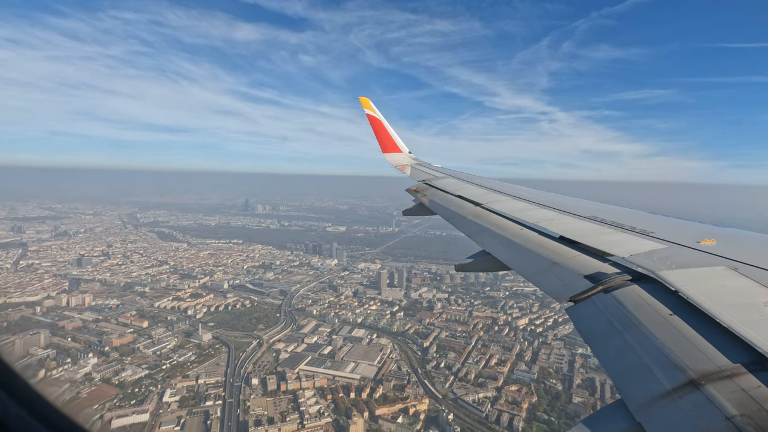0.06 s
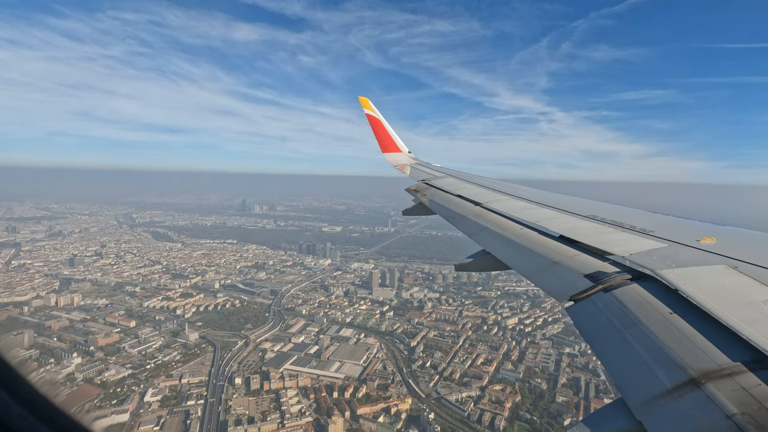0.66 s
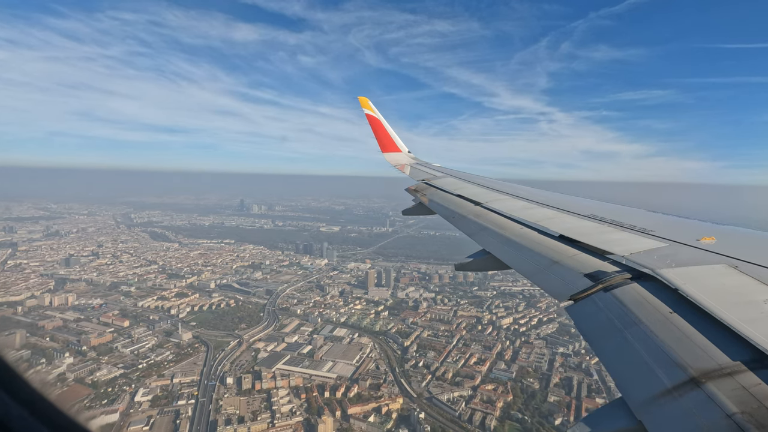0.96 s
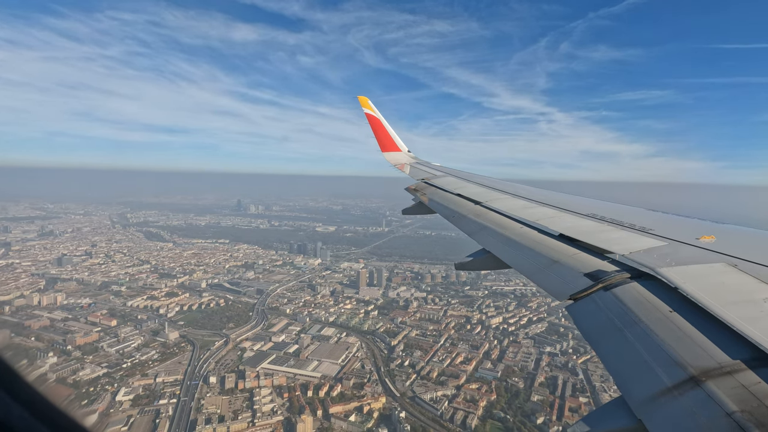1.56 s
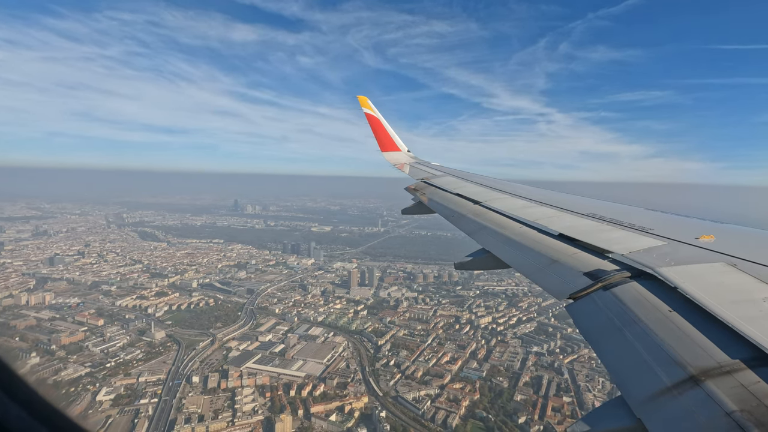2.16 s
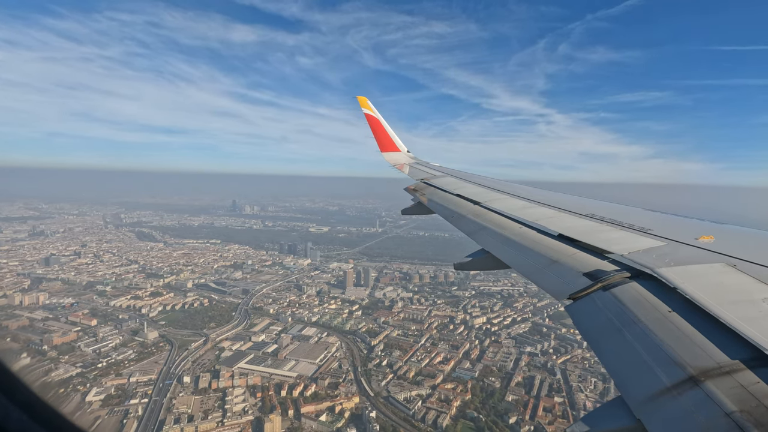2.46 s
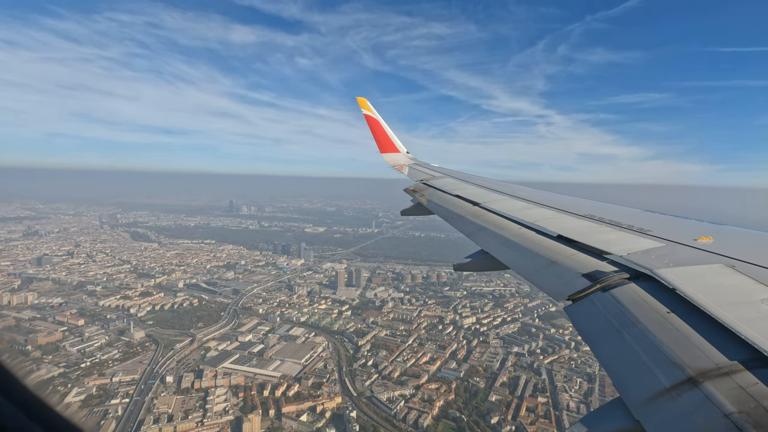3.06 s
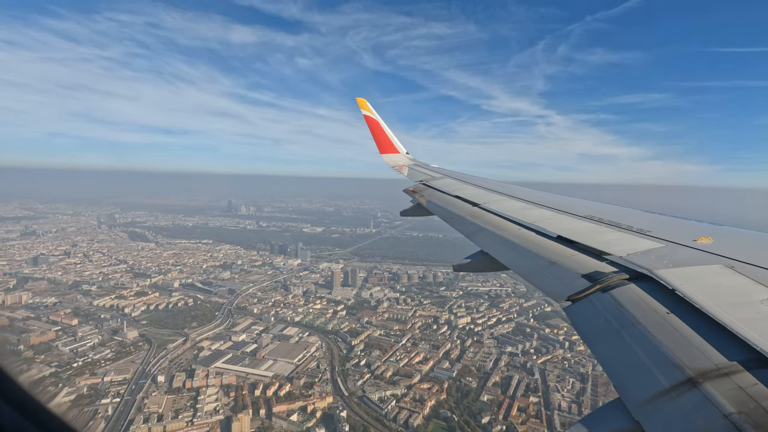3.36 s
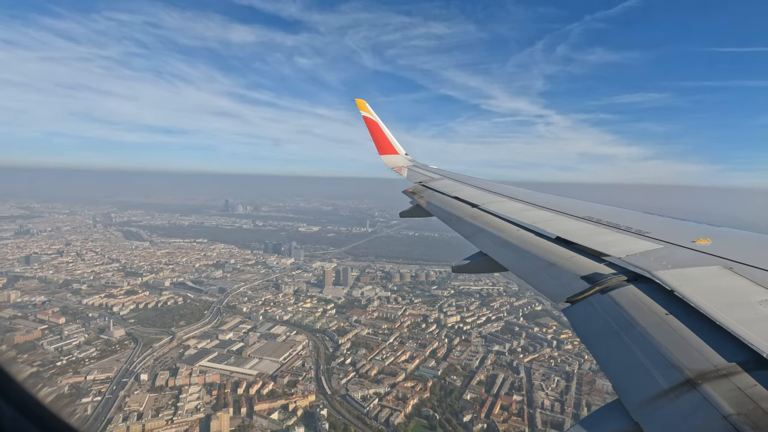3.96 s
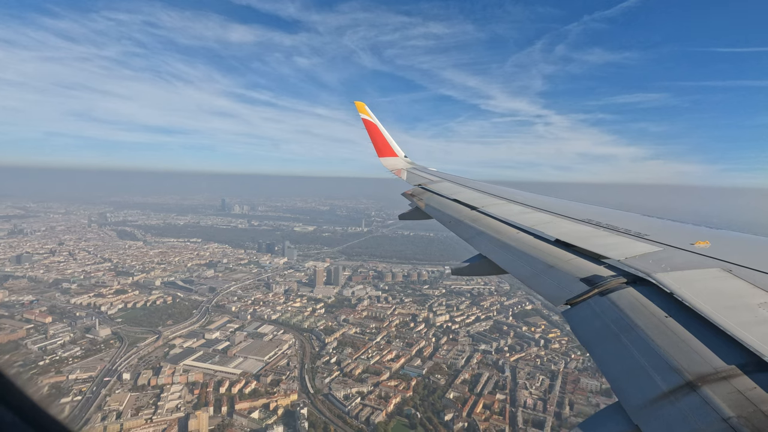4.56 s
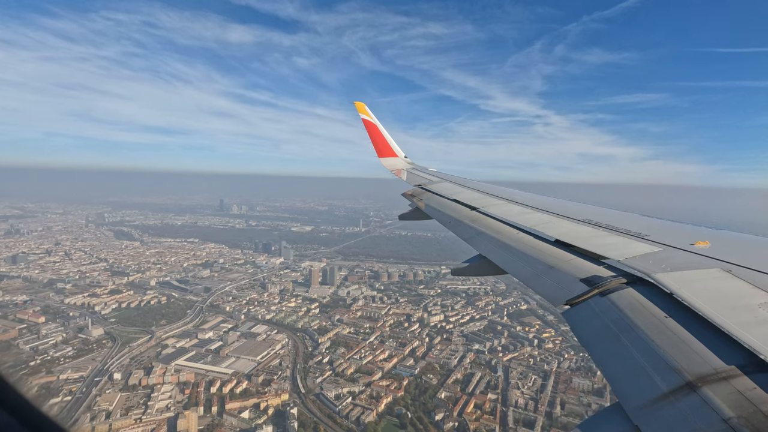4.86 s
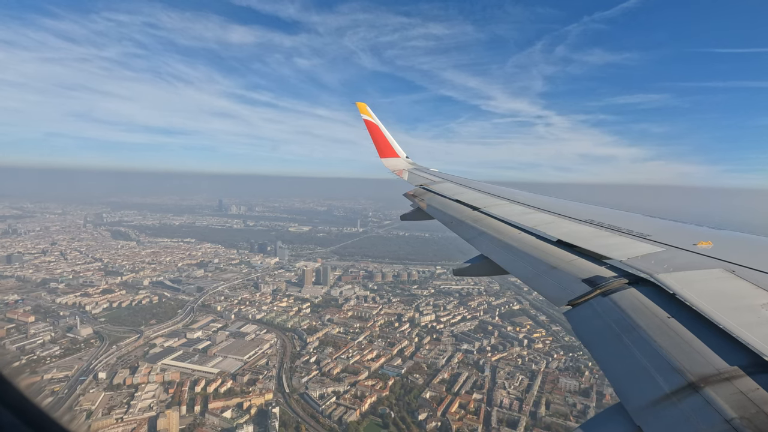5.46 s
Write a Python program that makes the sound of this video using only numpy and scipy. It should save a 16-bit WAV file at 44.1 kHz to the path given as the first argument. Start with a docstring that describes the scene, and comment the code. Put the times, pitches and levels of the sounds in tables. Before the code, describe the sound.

Jet engines rumble and drone evenly through an airliner cabin in flight, while a plastic wrapper faintly rustles and ticks.

```python
"""Airliner engines rumble and drone through the fuselage, heard in flight at a window over the wing.
Air rushes along the skin and a fast rotor holds a thin whine. Close by, a plastic wrapper rustles
and ticks faintly as its creases give way; there are a few soft scuffs, and near the end a bit
of trim clacks. A limiter on the bass holds down the crests of the roar."""
import sys
import numpy as np
from scipy.fft import rfft, irfft, next_fast_len
from scipy.io import wavfile
from scipy.ndimage import uniform_filter1d, minimum_filter1d, map_coordinates

SR = 44100
rng = np.random.default_rng(int(sys.argv[2]) if len(sys.argv) > 2 else 0)


def to_wav(s):
    """Save 16-bit WAV."""
    ch = np.atleast_2d(s).T  # columns
    pcm = np.round(np.clip(ch, -1, 1) * 32767)  # PCM
    wavfile.write(sys.argv[1], SR, pcm.astype(np.int16))


N = 246959
TIME = np.arange(N) / SR
ATTACK_S = 0.000099  # onset of a crinkle or a clack


def amp(db):
    """Decibels to gain."""
    return 10 ** (np.asarray(db) / 20)


def unit(x):
    """Scale to rms 1."""
    return x / np.sqrt(np.mean(x ** 2) + 1e-20)


def along(points, hz):
    """Read a curve of (f/Hz, value) breakpoints on a log frequency axis."""
    f, values = np.transpose(points)
    return np.interp(np.log(hz + 1), np.log(f + 1), values)


def wobble(rate):
    """Smooth random modulation, rate knots a second."""
    knots = rng.standard_normal(int(N * rate / SR) + 4)
    return map_coordinates(knots, [np.arange(N) * rate / SR])


def swell(centre_s, half_s):
    """A bell-shaped fade in and out."""
    return np.exp(-.5 * ((TIME - centre_s) / half_s) ** 2)


def filtered(x, response):
    """Zero-phase EQ; response gives the gain at each frequency."""
    size = next_fast_len(N + SR // 2)
    return irfft(rfft(x, size) * response(np.fft.rfftfreq(size, 1 / SR)), size)[..., :N]


def steady(x, span_s):
    """Ride a noise to rms 1, evening out swells slower than span_s."""
    power = uniform_filter1d(np.mean(x ** 2, axis=0), max(int(span_s * SR), 1))
    return x / np.sqrt(np.abs(power) + 1e-6)


def stereo(mid, side, width=1):
    """Mid and side to left and right."""
    return np.array([mid + width * side, mid - width * side])


# Stereo image of the cabin: f/Hz, left-right correlation
CABIN_IMAGE = [(150, .9995), (280, .998), (480, 0.96), (700, .88), (950, 0.85), (1250, .75), (1900, .72),
               (2300, .76), (2950, .33), (3900, 0.54), (5400, .48), (7200, 0.55), (12000, .35)]
def diffuse(response):
    """Coloured noise of rms 1 that fills the cabin: near mono in the bass, wider higher up."""
    def mid_side_eq(hz):
        spread = np.arccos(np.clip(along(CABIN_IMAGE, hz), 0, 1)) / 2
        return response(hz) * [np.cos(spread), np.sin(spread)]
    mid, side = filtered(rng.standard_normal((2, N)), mid_side_eq)
    return unit(stereo(mid, side))


def rush(spectrum):
    """A diffuse noise bed shaped by an EQ curve."""
    return diffuse(lambda hz: amp(along(spectrum, hz)))


def band(centre_hz, width_hz):
    """Diffuse noise in one resonance."""
    return diffuse(lambda hz: 1 / (1 + ((hz - centre_hz) / width_hz) ** 2))


# EQ of the deep rumble in the airframe: f/Hz, level/dB
RUMBLE_EQ = [(8, -20.5), (20, -9), (32, -8.5), (41, -5), (48, 2), (58, .3), (78, -.8), (98, -1.8),
             (108, -2.5), (118, -9), (150, -17), (220, -42), (400, -100)]
# EQ of the cabin drone: f/Hz, level/dB
DRONE_EQ = [(70, -35.5), (110, -5.5), (135, 2.5), (166, -2.5), (195, 0.15), (218, -1.72), (260, -5.5),
            (300, -9.5), (350, -11.5), (400, -17), (475, -22), (620, -34), (1200, -95.5)]
# Narrow hums of engines and fans: f/Hz, half width/Hz, level/dB
HUM_BANDS = [(88.1, 2.5, -29), (425, 11, -45), (447, 1.8, -51), (509.6, 4.8, -51), (1075, 9.8, -70.5),
             (2320, 22, -72.5)]
def engines(rumble_db=-15.5, drone_db=-20.0):
    """At constant thrust, rumble and drone come through the structure; turning parts hum on top."""
    rumble = amp(rumble_db) * steady(rush(RUMBLE_EQ), span_s=0.14)
    drone = amp(drone_db) * steady(rush(DRONE_EQ), span_s=.2)
    hums = sum(amp(db) * steady(band(hz, width), span_s=0.23) for hz, width, db in HUM_BANDS)
    return rumble + drone + hums


def whine(pitch_hz=917, drift_hz=1.2, level_db=-54.0, waver_db=0.9):
    """A fast rotor holds one thin tone, its level wavering separately left and right."""
    phase = 2 * np.pi * np.cumsum(pitch_hz + drift_hz * wobble(5.6)) / SR
    waver = np.array([wobble(11), wobble(5.5)])
    return amp(level_db + waver_db * waver) * unit(np.sin(phase))


# EQ of the air along the skin: f/Hz, level/dB
AIR_EQ = [(300, -46.5), (480, -8.5), (690, 0.14), (810, -5), (930, -1.5), (1040, -5.5), (1200, -12),
          (1450, -12.3), (1750, -17), (2200, -16), (2900, -23), (3450, -28), (3950, -24), (4450, -26.5),
          (5100, -33), (7200, -38.5), (8400, -50), (11500, -52.5), (14000, -65.5)]
def airflow(level_db=-44.5, flutter_db=1.15):
    """The turbulent layer on the skin hisses evenly, with a slight flutter."""
    return amp(level_db + flutter_db * wobble(3.1)) * rush(AIR_EQ)


WRAPPER_WIDTH = .38  # side gain against mid
# Bright colour of thin plastic: f/Hz, level/dB
PLASTIC_EQ = [(900, -18.5), (1500, 1), (2300, -1), (3300, -3), (4500, 1.5), (5800, -1.5), (7000, -1),
              (8200, -7.5), (9400, -15), (11000, -11.5), (12500, -14.5), (14500, -36.5)]
# Bouts of handling the wrapper: start t/s, end t/s, level/dB
HANDLING_CUES = [(0.035, 1.5, -71.5), (1.565, 2.13, -69), (2.222, 3.08, -74.5), (3.752, 5.578, -78.5)]
# The film sliding over itself: t/s, level/dB, half length/s
RUB_CUES = [(0.41, -67, .016), (0.575, -66, .02), (0.745, -65, .016), (0.97, -70, .012), (1.09, -65, .016),
            (1.37, -66, .016), (1.615, -64, .012), (1.915, -64, .016), (1.985, -65, .012),
            (2.035, -62, .012), (2.112, -65, .012), (2.435, -69, .02), (2.605, -69, .024),
            (2.995, -65.5, .015), (3.06, -68, .018), (3.83, -71, .045), (4.43, -72, .025),
            (4.61, -69.5, .02), (5.11, -67.5, .018)]
def wrapper(spiky_db=4.5, clump_db=3.0, fidget_db=1.5, flex_db=-73, grip_s=.04, let_go_s=0.043):
    """Tiny creases give way in clumps as the film is handled, more in each rub and around each crinkle."""
    handling = np.zeros(N)
    for start, end, db in HANDLING_CUES:
        fade_in = np.clip((TIME - start) / grip_s + 1, 0, 1)
        fade_out = np.exp(-np.maximum(TIME - end, 0) / let_go_s)
        handling += amp(db) * fade_in * fade_out
    handling *= amp(fidget_db * wobble(16))
    flexing = amp(flex_db) * sum(swell(s, half_s=.018) for s, *_ in CRINKLE_CUES)
    rubbing = sum(amp(db) * swell(s, half_s) for s, db, half_s in RUB_CUES)
    envelope = np.sqrt(handling ** 2 + flexing ** 2 + rubbing ** 2) * amp(clump_db * wobble(90))
    creases = unit(amp(spiky_db * wobble(1200))) * rng.standard_normal((2, N))
    mid, side = unit(filtered(creases, lambda hz: amp(along(PLASTIC_EQ, hz))))
    return envelope * stereo(mid, side, WRAPPER_WIDTH)


# Larger creases snapping: t/s, level/dB, ring f/Hz, t60/s
CRINKLE_CUES = [(0.028, -49, 7000, .05), (0.0715, -52, 7000, 0.04), (0.158, -57, 6460, .06),
                (0.225, -49.5, 4000, .07), (0.289, -53, 11800, .05), (0.458, -51, 7200, .06),
                (0.5582, -49, 6600, 0.09), (0.629, -52, 11500, .04), (0.725, -56, 5000, .04),
                (0.8218, -50, 6960, 0.042), (0.8668, -51.5, 11600, .08), (0.9595, -55, 6400, 0.07),
                (1.076, -56.5, 11000, .08), (1.173, -49, 7400, .03), (1.2035, -55, 7400, .03),
                (1.43, -45, 7000, .055), (1.5135, -50.5, 11500, .04), (1.6075, -53, 6000, .06),
                (1.675, -51, 7000, 0.043), (1.6872, -50, 6500, .04), (1.76, -55, 6500, .04),
                (1.792, -55, 7100, .04), (2.039, -40, 7500, 0.036), (2.0415, -44, 10800, .03),
                (2.118, -53, 6000, .04), (2.1245, -48.5, 7600, 0.06), (2.2378, -55, 7000, .05),
                (2.44, -56, 7400, .06), (2.765, -55, 7000, .04), (2.8145, -51, 6500, 0.054),
                (3.0083, -52, 10800, 0.069), (3.05, -51.5, 7040, 0.031), (3.959, -50, 7000, 0.055),
                (4.6404, -54, 7200, .04)]
def crinkles(crest_db=6.0, spiky_db=4.5, ring_db=7.5, ring_octaves=.18, size=8192):
    """A larger crease snaps through: a burst of tiny cracks that rings at its own pitch and dies fast."""
    out = np.zeros((2, N + size))
    age, hz = np.arange(size) / SR, np.fft.rfftfreq(size, 1 / SR)
    for s, db, ring_hz, t60 in CRINKLE_CUES:
        boost_db = ring_db * np.exp(-.5 * (np.log2((hz + 1) / ring_hz) / ring_octaves) ** 2)
        cracks = rng.standard_normal((2, size)) * amp(spiky_db * rng.standard_normal(size))
        mid, side = unit(irfft(rfft(cracks) * amp(along(PLASTIC_EQ, hz) + boost_db)))
        snap = amp(db - crest_db - 60 * age / t60) * (1 - np.exp(-age / ATTACK_S))
        out[:, round(s * SR):][:, :size] += snap * stereo(mid, side, WRAPPER_WIDTH)
    return out[:, :N]


# Swells of midrange noise: t/s, level/dB, f/Hz, half width/Hz, half length/s
SWELL_CUES = [(1.61, -52, 1300, 400, .025), (1.68, -59.5, 1800, 900, .17), (1.84, -57, 1600, 200, .03),
              (2.046, -50.5, 2100, 1000, .009), (2.126, -57, 2800, 1000, .008),
              (5.125, -52, 1960, 150, .035), (5.19, -57.5, 4300, 1400, .009),
              (5.555, -51.5, 2400, 800, .009)]
def scuffs_and_body():
    """Short midrange noise swells: soft scuffs, and the dull body of the loudest crinkle and clack."""
    return sum(amp(db) * swell(s, half_s) * band(hz, width) for s, db, hz, width, half_s in SWELL_CUES)


# Hard bits of trim knocking together: t/s, level/dB
CLACK_CUES = [(5.186, -60), (5.478, -52), (5.546, -53), (5.5505, -44.5), (5.561, -54)]
# Modes of the trim panel: f/Hz, level/dB, t60/s
PANEL_MODES = [(1475, -1, .04), (1793, -4, .04), (2320, 1.5, .06), (2650, -3, .03), (3500, -6.5, .03),
               (4091, -6, .04), (5150, -14, .025), (6700, -15, .025)]
def clacks(scatter_db=1.5, size=8192):
    """Each contact rings the few short modes of a trim panel, in a different balance left and right."""
    out, age = np.zeros((2, N + size)), np.arange(size) / SR
    attack = 1 - np.exp(-age / ATTACK_S)
    for s, db in CLACK_CUES:
        for hz, mode_db, t60 in PANEL_MODES:
            level_db = db + mode_db + scatter_db * rng.standard_normal((2, 1))
            phase = 2 * np.pi * (hz * age + rng.random())
            out[:, round(s * SR):][:, :size] += amp(level_db - 60 * age / t60) * np.sin(phase) * attack
    return out[:, :N]


# Balance of the cabin: f/Hz, left minus right level/dB
CABIN_PAN = [(60, 0.03), (120, -0.46), (250, 0.23), (400, 1), (700, 2), (1300, 1.5), (2400, 1.5),
             (4400, 0.5), (8000, 2.9), (13000, 2)]
def scene():
    """The steady bed and the small sounds on top, leaning slightly to the left."""
    cabin = engines() + whine() + airflow() + wrapper() + crinkles() + clacks() + scuffs_and_body()
    return filtered(cabin, lambda hz: amp(np.array([[.5], [-.5]]) * along(CABIN_PAN, hz)))


def record(dry, ceiling=0.39, knee=6, smooth_s=0.0037, split_hz=260, top_hz=15700, rolloff_hz=2000):
    """A quick soft-knee limiter on the bass rounds the crests of the roar; a high cut follows."""
    bass = filtered(dry, lambda hz: 1 / (1 + (hz / split_hz) ** 4))
    target_gain = (1 + (np.abs(bass).max(axis=0) / ceiling) ** knee) ** (-1 / knee)
    size = int(smooth_s * SR)
    held_gain = minimum_filter1d(target_gain, 2 * size)
    gain = uniform_filter1d(uniform_filter1d(held_gain, size), size)
    limited = dry + (gain - 1) * bass
    return filtered(limited, lambda hz: np.clip((top_hz - hz) / rolloff_hz, 0, 1))


dry = scene()
out = record(dry)
to_wav(out)
```